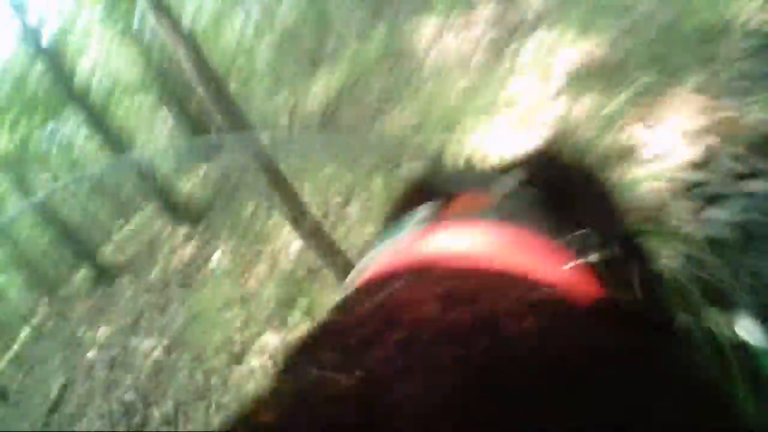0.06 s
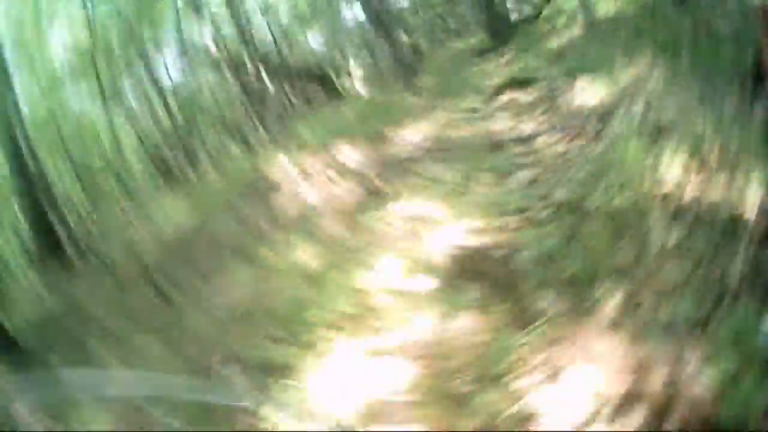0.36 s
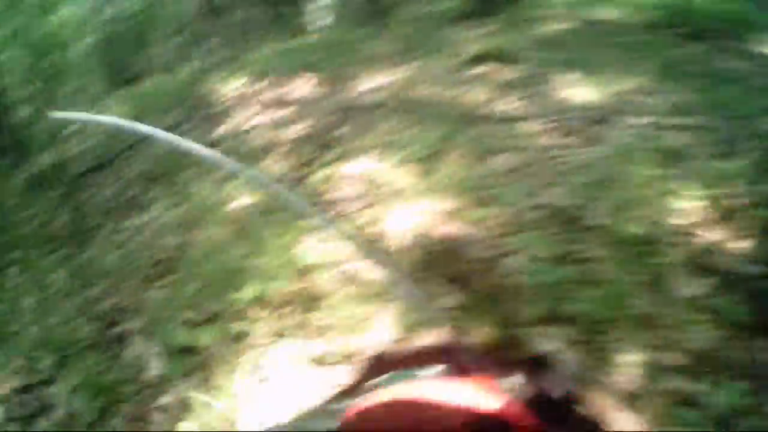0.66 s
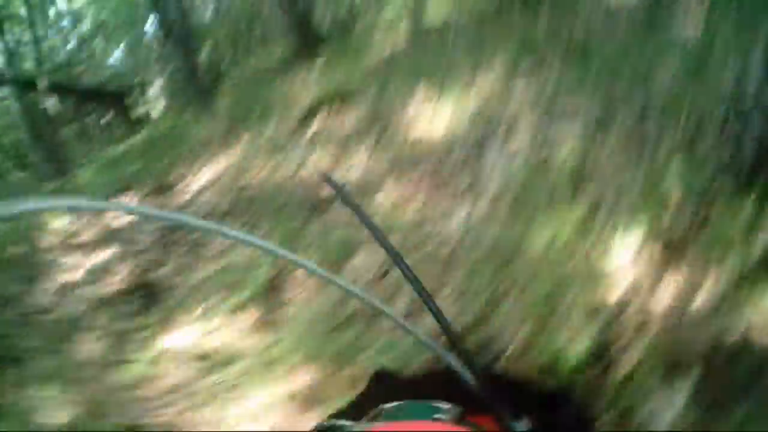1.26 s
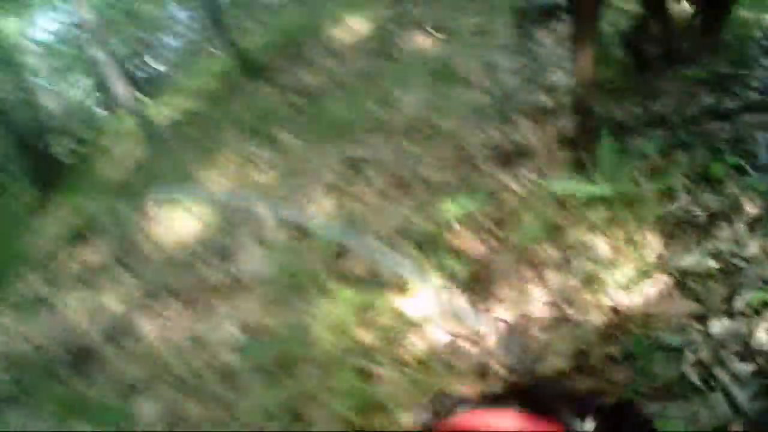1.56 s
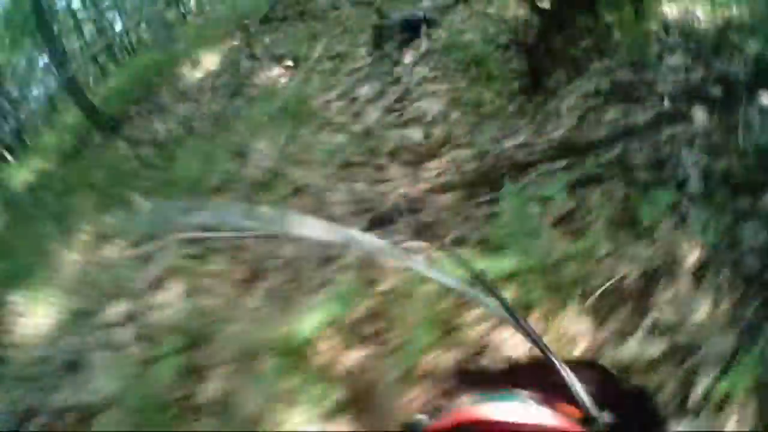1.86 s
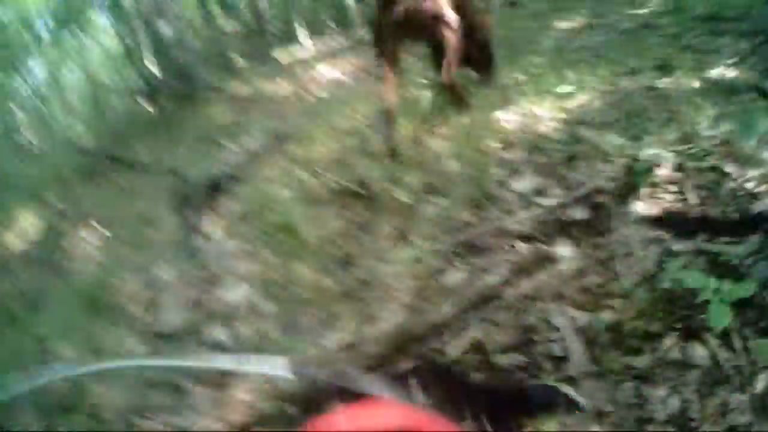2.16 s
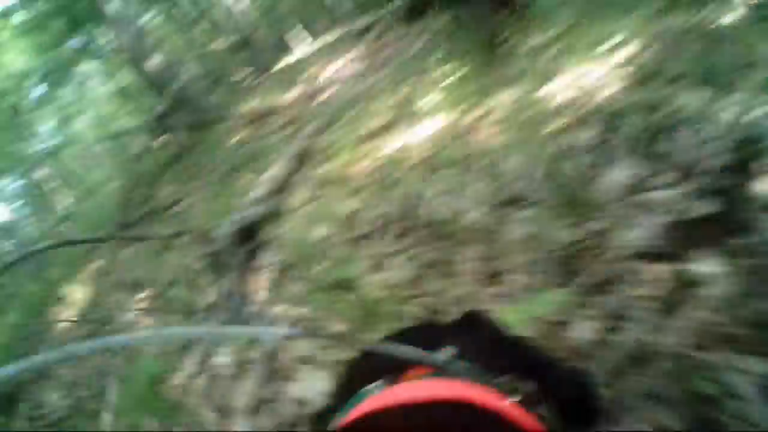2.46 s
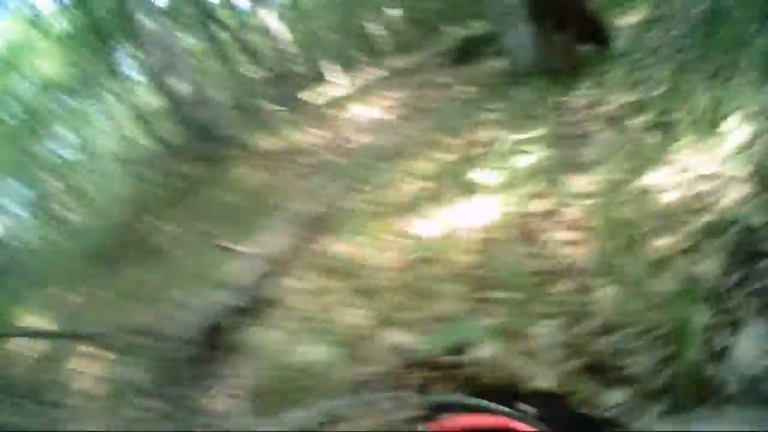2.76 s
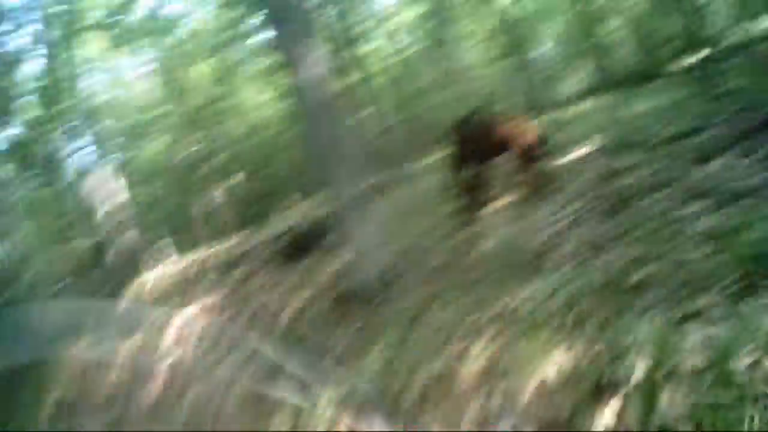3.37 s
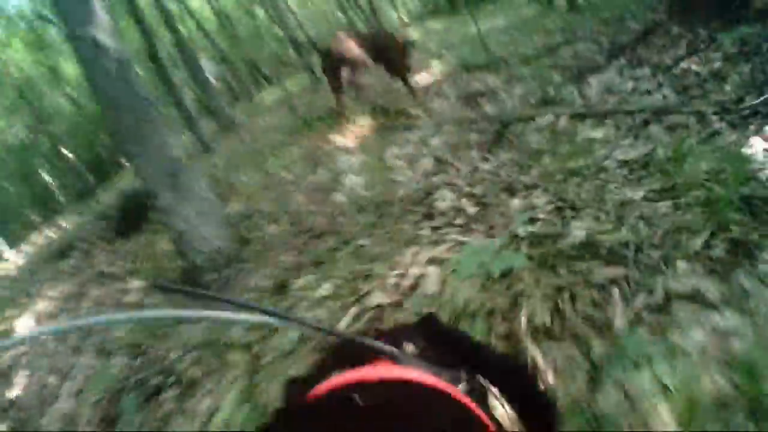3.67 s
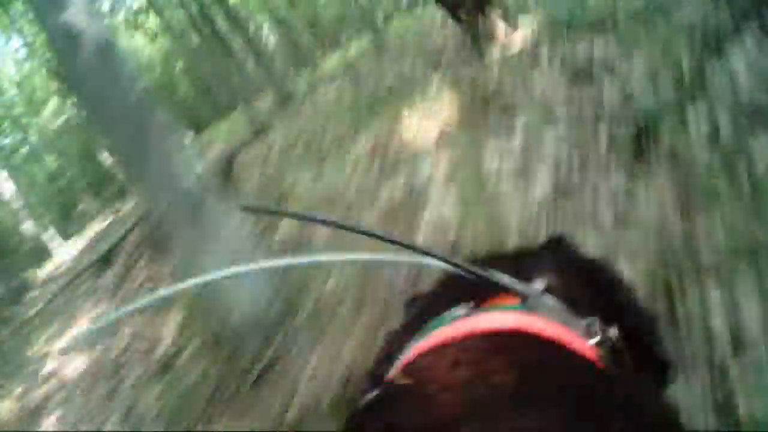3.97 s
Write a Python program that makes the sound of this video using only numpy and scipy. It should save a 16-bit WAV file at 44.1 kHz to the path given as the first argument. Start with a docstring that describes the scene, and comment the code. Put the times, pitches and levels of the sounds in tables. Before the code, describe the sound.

Four brief bays from a moving dog, with sharp knocks and taps from its gear.

```python
"""A hound bays four times, short and clear, walking through a forest with a small camera on its back.
Each bay is a harmonic tone whose pitch steps up and sags while the mouth, a changing resonator, opens
and closes; the trunks return a weak echo. Gear knocks, straps tap and leaves rub on the camera's housing,
exciting its modes. Two hard knocks overload the microphone and steps jolt it. Underneath lie a low
rumble of movement and the faint hiss and buzz of the electronics."""
import sys
import numpy as np
from scipy import signal
from scipy.fft import rfft, irfft
from scipy.io import wavfile

SR = 44100
rng = np.random.default_rng(int(sys.argv[2]) if len(sys.argv) > 2 else 0)


def log_audio(samples):
    """Write samples as a 16-bit WAV file to the path given in sys.argv[1]."""
    # one column per channel
    frames = np.atleast_2d(samples).T
    # limit to full scale, then quantise
    limited = np.clip(frames, -1, 1)
    pcm = np.round(limited * 32767).astype(np.int16)
    wavfile.write(sys.argv[1], SR, pcm)


N = 176400
TIME = np.arange(N) / SR

# the course of each bay: (time [s], pitch [Hz], overtone level [dB], mouth opening [0-1])
BAY_1 = [(1.34, 414, -37, 0.74), (1.37, 402.7, -27.5, 0.88), (1.399, 398.1, -28, 0.74),
         (1.421, 407.3, -22, 0.63), (1.435, 463, -35, 0.3), (1.478, 453, -37.5, 0.05), (1.5, 412, -37, 0.3)]
BAY_2 = [(1.904, 394.6, -22.5, 0.56), (1.915, 387.6, -24.5, 0.64), (1.937, 421.3, -31, 0.78),
         (1.976, 416.6, -17, 0.47), (1.99, 451, -31, 0.47), (2.036, 392, -40.5, 0.2)]
BAY_3 = [(3.1, 357.7, -38.5, 0.72), (3.127, 384.6, -24, 0.65), (3.144, 385.4, -18.5, 0.55),
         (3.157, 406.7, -27.5, 0.77), (3.182, 407.7, -28, 0.74), (3.205, 426.4, -20, 0.54),
         (3.217, 446.6, -33, 0.26), (3.245, 440.3, -32.5, 0.26), (3.266, 401, -38, 0.22)]
BAY_4 = [(3.565, 367.6, -32, 0.71), (3.582, 377, -27.5, 0.76), (3.601, 417.5, -27.5, 0.73),
         (3.629, 405.2, -18, 0.54), (3.645, 443, -28.5, 0.48), (3.679, 452, -33.5, 0.21),
         (3.713, 396.7, -37.5, 0.23)]
# relative response of throat and mouth: (frequency [Hz], closed [dB], half open [dB], wide open [dB])
VOCAL_TRACT = [(950, -6, 9.5, 1), (1213, -31, -18, 17.5), (1450, -43, -44.5, -25), (2000, -41, -33.5, -4),
               (2750, -39.5, -50.5, -41)]
# modes of the housing: (frequency [Hz], relative level [dB], decay time T60 [s])
HOUSING_MODES = [(537.2, -11, 0.018), (776, -5.5, 0.035), (883, -2, 0.035), (1084, -9.5, 0.029),
                 (2000, -6, 0.02), (2294, -6, .02), (2900, -7.5, .016), (3200, -17, .02),
                 (3780, -21.5, 0.045), (4600, -17.5, 0.026), (6397, -22.5, .028), (7350, -36, 0.037)]
# gear strikes the housing:
# (time [s], level [dB], gear frequency [Hz], relative gear level [dB], contact cutoff [Hz])
KNOCKS = [(0.0157, -33.5, 930, 6.5, 2400), (0.8095, -26.5, 2330, -1.5, 3600), (.8112, -30, 1060, 9.5, 1970),
          (.9090, -40.5, 2270, -2.5, 2570), (1.7250, -35, 970, -4.5, 2140), (2.3267, -11, 3084, 9.5, 4760),
          (2.3274, -13, 1156, 13, 4010), (2.3272, -5.5, 2063, 15, 4120), (2.3496, -24, 930, 3, 2290),
          (2.4647, -35.5, 513, -2.5, 1477), (2.5965, -27.5, 947.6, -10.5, 2416),
          (3.9285, -24, 2219, 1.5, 3400), (3.9476, -12.5, 2866, 7, 9000), (3.9488, -22.5, 2060, 20.5, 7400)]
# light taps of the straps: (time [s], level [dB])
STRAP_TAPS = [(.167, -51), (0.26, -42.5), (0.529, -42.5), (.773, -41), (1.432, -43.5), (1.676, -41),
              (1.718, -27), (1.959, -30.5), (1.985, -34.5), (2.17, -46), (2.341, -26), (2.627, -44),
              (2.696, -44)]
# straps and leaves rub on the housing: (time [s], level [dB])
RUBBING = [(.28, -61), (.42, -70.5), (.8, -58.5), (1.15, -70.5), (2.35, -59.5), (3.05, -68.5), (3.875, -62),
           (3.905, -40.5), (3.96, -58)]
# pressure pulses at the microphone: (time [s], level [dB], duration [s])
JOLTS = [(0.755, -31, 0.018), (.811, -37.5, 0.0023), (1.682, -33.5, 0.005), (2.117, -37.5, 0.0026),
         (2.329, -16.5, .0052), (2.737, -40.5, 0.00325), (3.9279, -8.5, 0.0036)]
# spectrum of rumble and hiss: (frequency [Hz], relative spectral density [dB])
NOISE_SPECTRUM = [(25, -4), (90, -14), (200, -19.5), (430, -32), (1600, -36.5), (4200, -41.5), (6500, -52),
                  (9000, -71)]

FUNDAMENTAL_PEAKS_DB = (-28, -38.5, -34, -34)  # one for each bay


def bay(rows, peak_db, attack_s=.016, release_s=.015, jitter=.0014, shimmer_db=.85, rasp_hz=(640, 900)):
    """Source and filter: the vocal tract weights the harmonics of a wavering tone; noise adds a rasp."""
    pitch, level_db, mouth = in_time(rows)
    start, end = rows[0][0], rows[-1][0]
    phase = 2 * np.pi * np.cumsum(pitch * (1 + jitter * drift(70))) / SR
    gate = np.interp(TIME, [start - attack_s, start, end, end + release_s], [0, 1, 1, 0]) ** 2
    # the fundamental swells as the jaw closes
    swell_db = np.interp(TIME, [start, end - .034, end], [-31.5, 0, -10.5])
    rasp = rms_one(filtered(rng.standard_normal(N), rasp_hz, "band", order=4))
    rasp *= 1 + .5 * mouth * np.cos(phase)  # pulses at the pitch
    voice = from_db(peak_db + swell_db) * np.sin(phase) + from_db(-34.5 + .58 * level_db) * rasp
    on = gate > 0
    pitch, phase, mouth = pitch[on], phase[on], np.clip(mouth[on], 0, 1)
    hz, *responses = np.transpose(VOCAL_TRACT)
    shares = [np.maximum(0, 1 - abs(2 * mouth - k)) for k in range(3)]  # closed, half open, wide open
    overtones, power = 0, 0
    for k in range(2, 7):
        tract_db = sum(share * np.interp(np.log(k * pitch), np.log(hz), response)
                       for share, response in zip(shares, responses))
        gain = from_db(tract_db + k * shimmer_db * drift(31)[on])  # higher harmonics flutter more
        overtones += gain * np.sin(k * phase)
        power += gain ** 2
    voice[on] += from_db(level_db[on]) * overtones / np.sqrt(power)
    return gate * voice


def forest_echo(voice, level_db=-34, t60=.35, delay_s=.025):
    """Scattering: the trunks return a weak, diffuse echo that decays exponentially."""
    t = TIME[:SR]
    echo = rng.standard_normal(SR) * from_db(-60 * t / t60) * (t > delay_s)
    return from_db(level_db) * signal.fftconvolve(voice, echo / np.linalg.norm(echo))[:N]


def gear_knocks(crack_db=-6, crack_t60=.018, gear_t60=.018, hollow_hz=(1330, 1720)):
    """Impact excitation: a blow gives a noisy crack and sets housing and gear in damped free vibration."""
    knocks, t = np.zeros(N + SR), TIME[:SR // 8]
    for s, db, gear_hz, gear_db, contact_hz in KNOCKS:
        crack = filtered(rng.standard_normal(len(t)), (280, 5200), "band", order=1)
        crack = rms_one(filtered(crack, hollow_hz, "stop"))  # the housing passes little in this band
        blow = crack * from_db(crack_db - 60 * t / crack_t60)
        for hz, mode_db, t60 in [*HOUSING_MODES, (gear_hz, gear_db, gear_t60)]:
            blow += from_db(mode_db - 60 * t / t60) * np.sin(2 * np.pi * hz * t)
        start = int(s * SR)
        knocks[start:start + len(t)] += from_db(db) * filtered(blow, contact_hz, "low")
    return filtered(knocks[:N], 420, "high")


def step_jolts(highpass_hz=44.17):
    """Transient response: each jolt is a half-sine pressure pulse, after which the microphone swings back."""
    pulses = sum(-from_db(db) * np.sin(np.pi * np.clip((TIME - s) / duration, 0, 1))
                 for s, db, duration in JOLTS)
    return filtered(pulses, highpass_hz, "high", order=1)


def strap_taps(spread_db=3, contact_hz=1900):
    """Modal superposition: each soft contact excites the housing's modes in its own mix."""
    s, db = np.transpose(STRAP_TAPS)
    mix_db = spread_db * rng.standard_normal((len(s), len(HOUSING_MODES)))
    modes = sum((-1) ** k * ring(clicks_at(s, from_db(db + mode_db + mix_db[:, k])), hz, t60)
                for k, (hz, mode_db, t60) in enumerate(HOUSING_MODES))
    return filtered(modes, contact_hz, "low")


def rubbing(slips_per_s=900, spread_db=4, flutter_db=5.5, t60_share=.35, contact_hz=1450):
    """Stick-slip friction: dense tiny slips drive the housing's modes, damped by a strap's pressure."""
    level_db, = in_time(RUBBING)
    sizes = from_db(spread_db * np.minimum(rng.exponential(1, N), 4)) * rng.choice([-1, 1], N)
    slips = sizes * (rng.random(N) < slips_per_s / SR) * from_db(flutter_db * drift(18))
    modes = sum((-1) ** k * from_db(db) * ring(slips, hz, t60 * t60_share)
                for k, (hz, db, t60) in enumerate(HOUSING_MODES))
    return from_db(level_db) * rms_one(filtered(modes, contact_hz, "low"))


def rumble_and_hiss(level_db=-57, rumble_hz=300, wander_db=2):
    """Amplitude modulation: the low end of a steady noise wanders and grows with the rubbing."""
    hz, db = np.transpose(NOISE_SPECTRUM)
    bins_hz = np.arange(N // 2 + 1) * SR / N
    colour = from_db(np.interp(np.log(bins_hz + 1), np.log(hz), db))
    noise = from_db(level_db) * rms_one(irfft(rfft(rng.standard_normal(N)) * colour, N))
    rub_db, = in_time(RUBBING)
    swell_db = wander_db * drift(12) + .35 * (rub_db - rub_db.mean())
    return noise + filtered(noise, rumble_hz, "low", order=1) * (from_db(swell_db) - 1)


def electronic_buzz(ticks_per_s=57.6, band_hz=(1400, 5190)):
    """Periodic impulses: faint ticks of the electronics fuse into a harmonic buzz."""
    ticks = np.arange(.0012, N / SR, 1 / ticks_per_s)
    return from_db(-40) * filtered(clicks_at(ticks, np.ones(len(ticks))), band_hz, "band", order=3)


def from_db(db):
    """Amplitude ratio of a level in decibels."""
    return 10 ** (np.asarray(db) / 20)


def rms_one(x):
    """Normalisation to unit rms."""
    return x / np.sqrt(np.mean(x ** 2) + 1e-20)


def in_time(rows):
    """Linear interpolation of each column over time."""
    s, *columns = np.transpose(rows)
    return [np.interp(TIME, s, column) for column in columns]


def filtered(x, hz, kind, order=2):
    """Maximally flat filter."""
    sections = signal.butter(order, np.clip(hz, 10, SR * .45), kind, fs=SR, output="sos")
    return signal.sosfilt(sections, x + 1e-18)


def drift(bandwidth_hz):
    """Random fluctuation: low-passed noise of unit rms."""
    return rms_one(filtered(rng.standard_normal(2 * N), bandwidth_hz, "low")[N:])


def clicks_at(s, gains):
    """Impulses at the given times."""
    return np.bincount((np.asarray(s) * SR).astype(int), gains, N)[:N]


def ring(x, hz, t60):
    """Damped resonator: a unit impulse starts a decaying sine of amplitude 1."""
    decay, angle = from_db(-60 / (t60 * SR)), 2 * np.pi * hz / SR
    return signal.lfilter([0, np.sin(angle)], [1, -2 * decay * np.cos(angle), decay ** 2], x + 1e-18)


def scene():
    """Superposition: the hound, its echo, its gear and the background add in one channel."""
    voice = sum(bay(rows, db) for rows, db in zip((BAY_1, BAY_2, BAY_3, BAY_4), FUNDAMENTAL_PEAKS_DB))
    hound = voice + forest_echo(voice)
    gear = gear_knocks() + step_jolts() + strap_taps() + rubbing()
    return (hound + gear + rumble_and_hiss() + electronic_buzz())[None]


def record(dry, limit=.97, converter_hz=9050, image_db=-12, cutoff_hz=15700):
    """Saturation and imaging: hard knocks overload; the converter cuts the top octave and mirrors treble."""
    converter = signal.ellip(6, .3, 30, converter_hz, fs=SR, output="sos")
    heard = signal.sosfilt(converter, np.clip(dry, -limit, limit))
    image = filtered(heard * (-1) ** np.arange(N), SR / 4, "high")  # f is mirrored to SR / 2 - f
    lowpass = signal.ellip(10, .5, 70, cutoff_hz, fs=SR, output="sos")
    return signal.sosfilt(lowpass, heard + from_db(image_db) * image)


dry = scene()
out = record(dry)
log_audio(out)
```